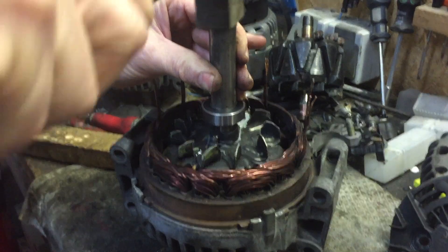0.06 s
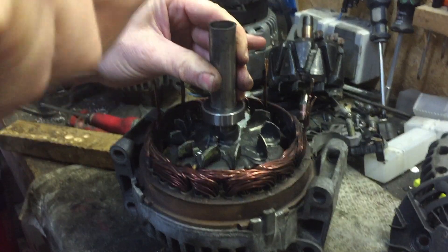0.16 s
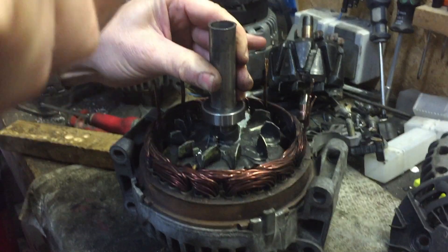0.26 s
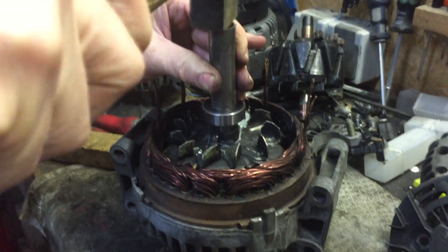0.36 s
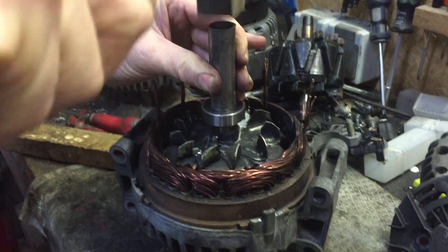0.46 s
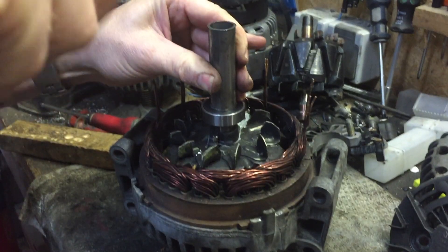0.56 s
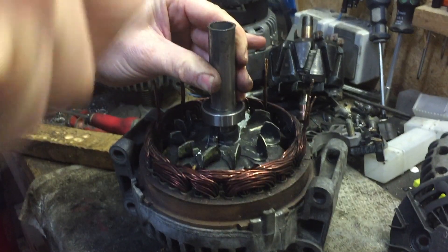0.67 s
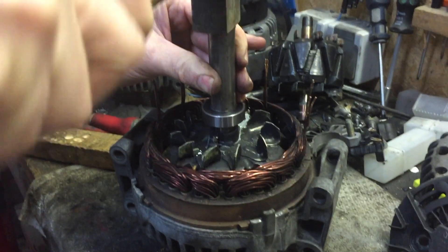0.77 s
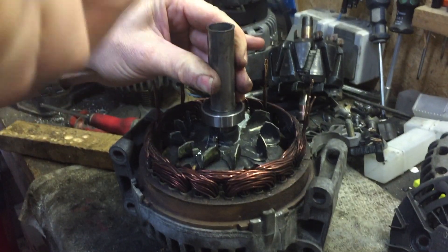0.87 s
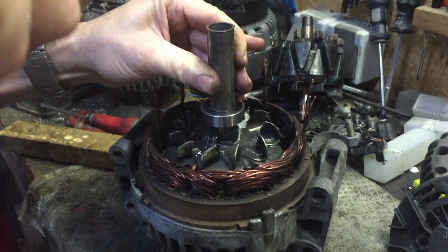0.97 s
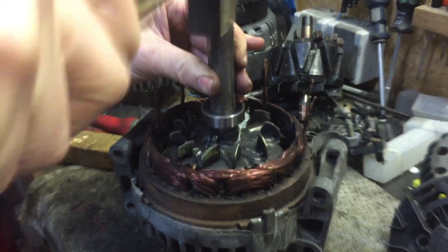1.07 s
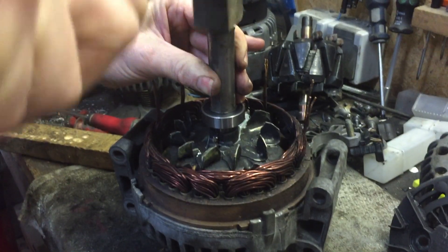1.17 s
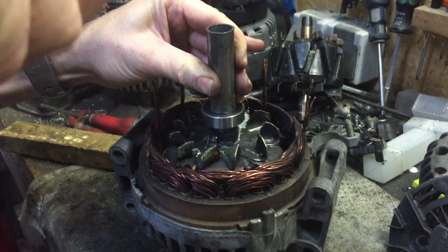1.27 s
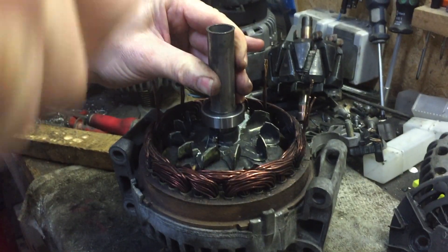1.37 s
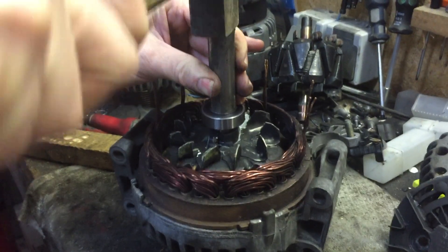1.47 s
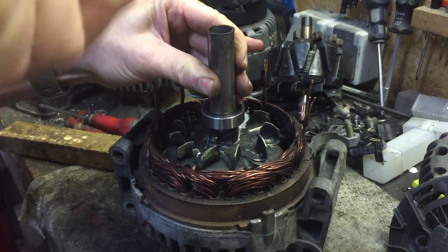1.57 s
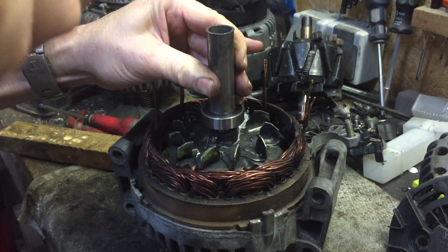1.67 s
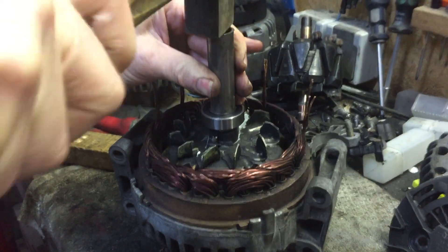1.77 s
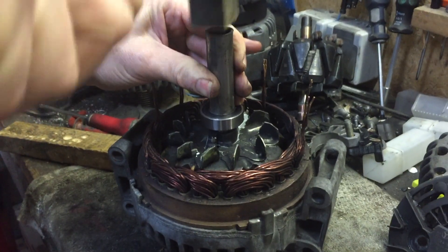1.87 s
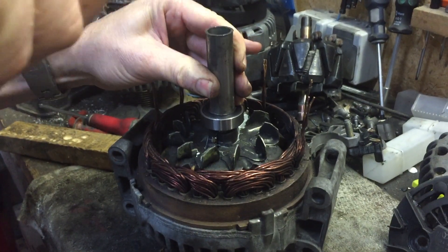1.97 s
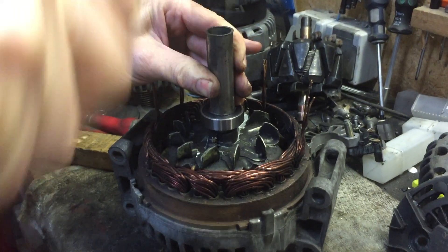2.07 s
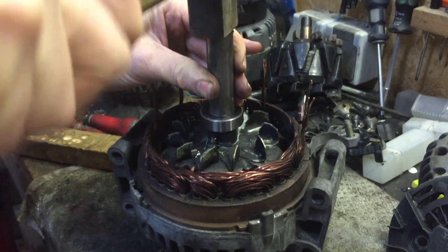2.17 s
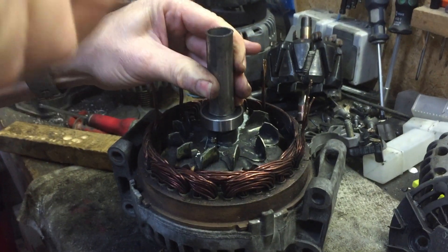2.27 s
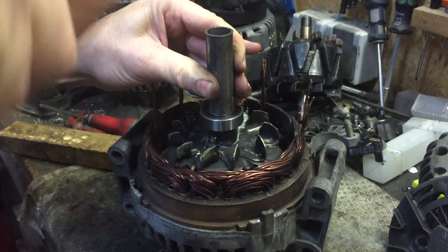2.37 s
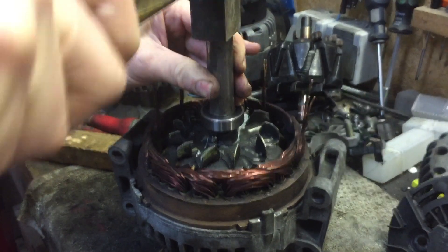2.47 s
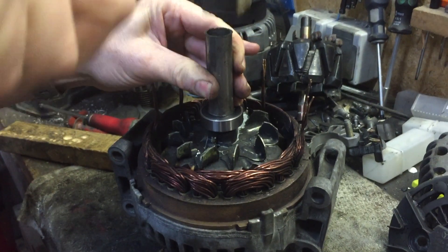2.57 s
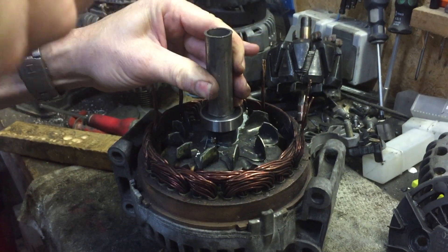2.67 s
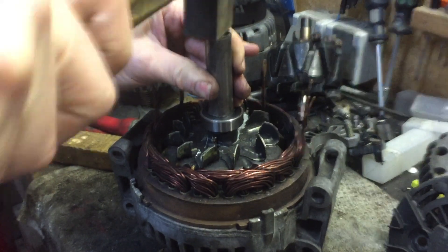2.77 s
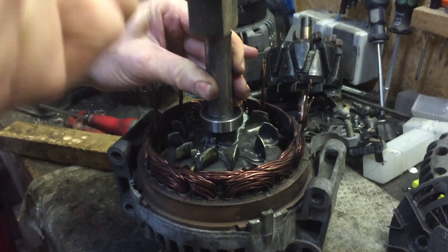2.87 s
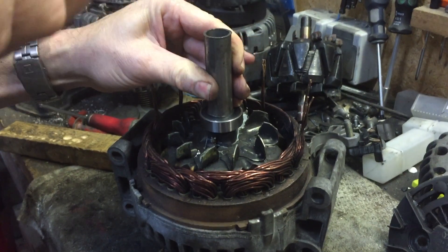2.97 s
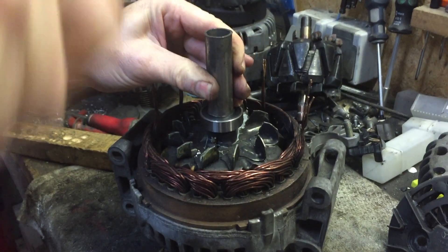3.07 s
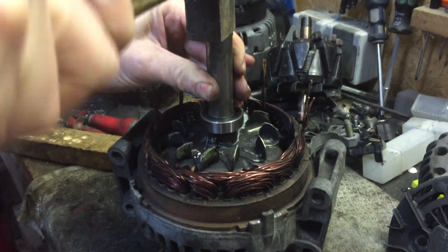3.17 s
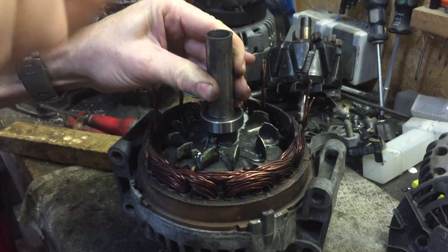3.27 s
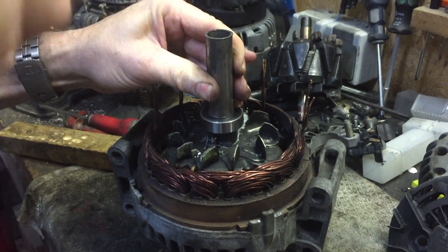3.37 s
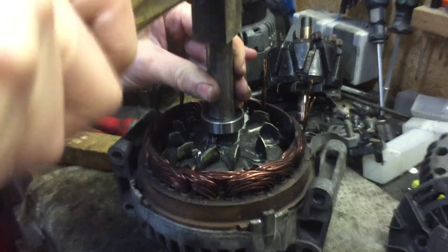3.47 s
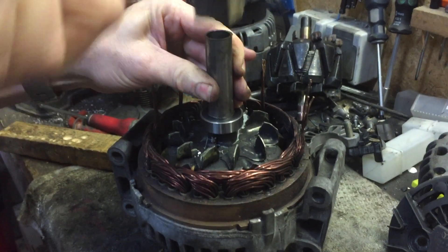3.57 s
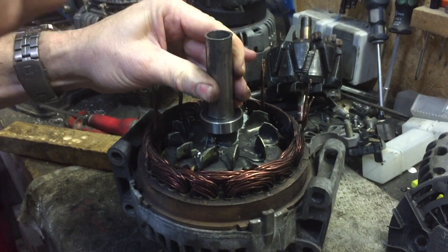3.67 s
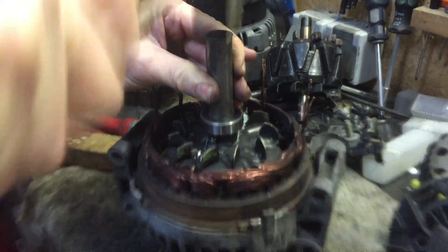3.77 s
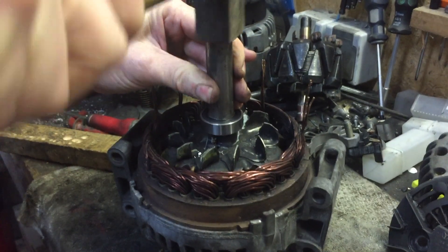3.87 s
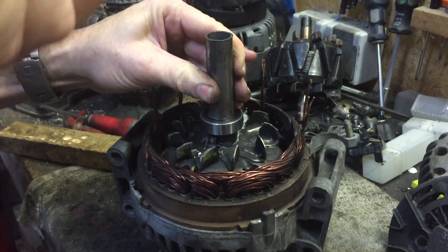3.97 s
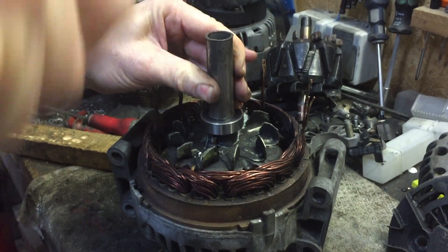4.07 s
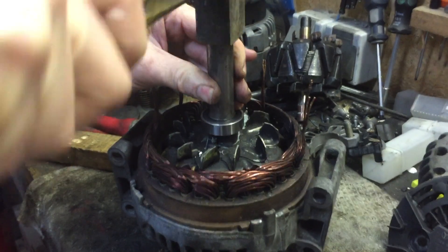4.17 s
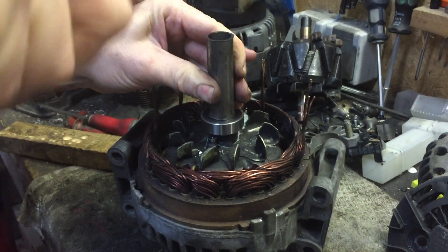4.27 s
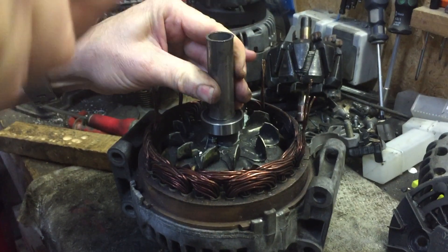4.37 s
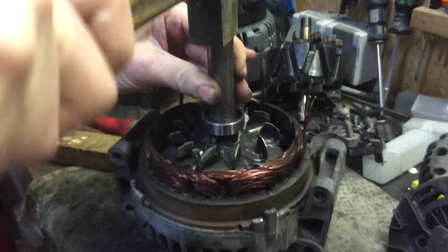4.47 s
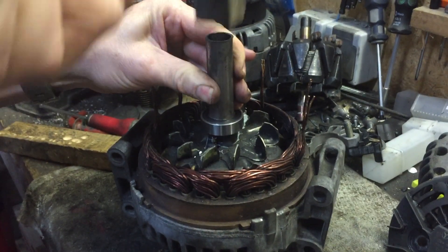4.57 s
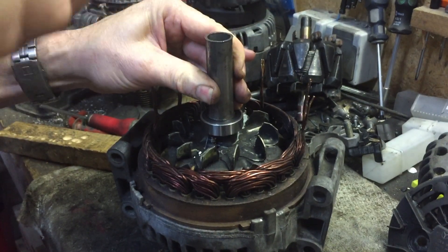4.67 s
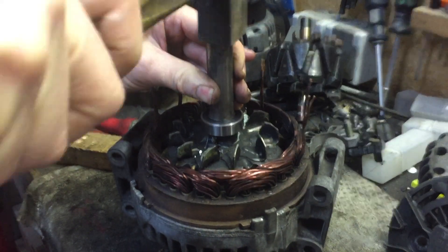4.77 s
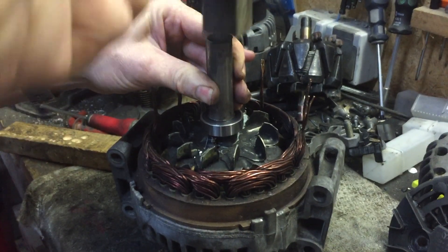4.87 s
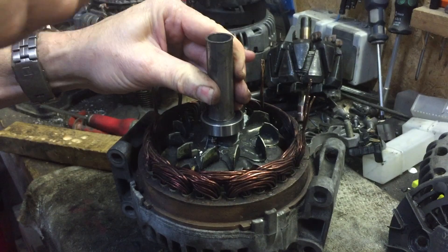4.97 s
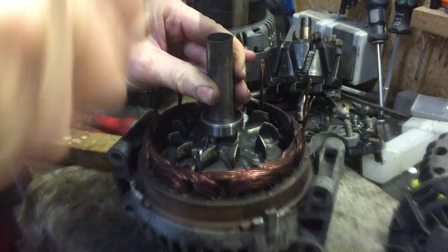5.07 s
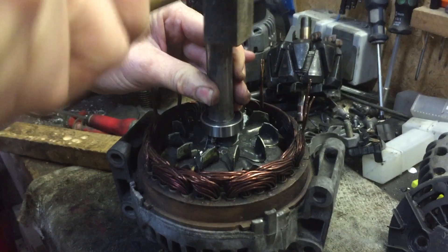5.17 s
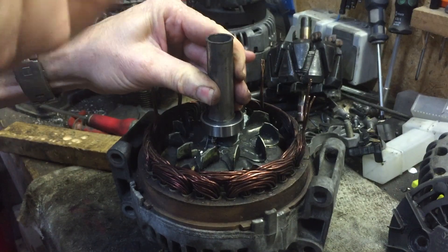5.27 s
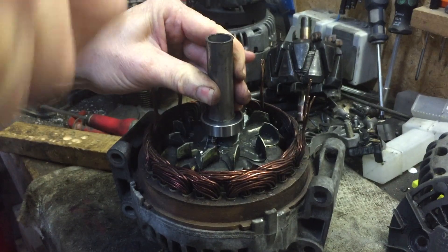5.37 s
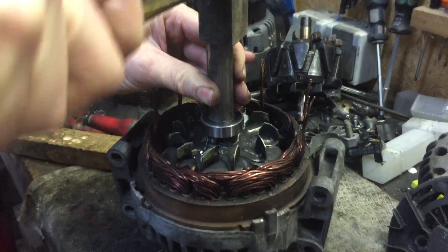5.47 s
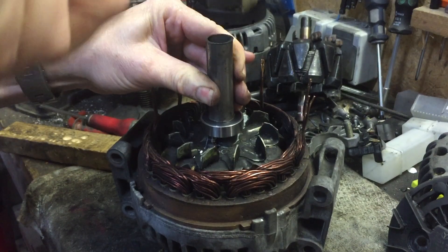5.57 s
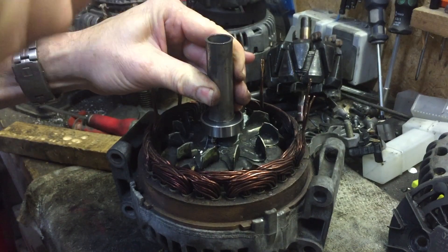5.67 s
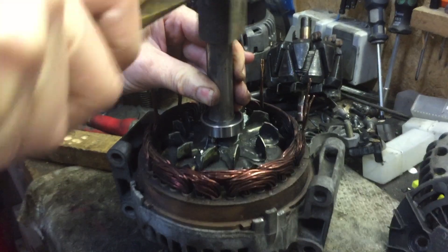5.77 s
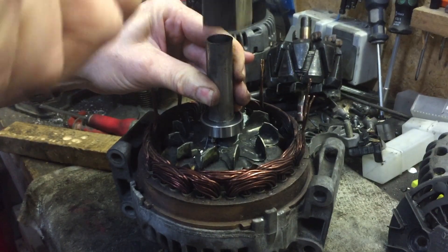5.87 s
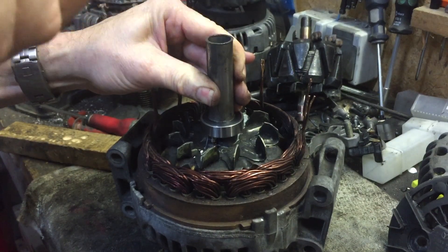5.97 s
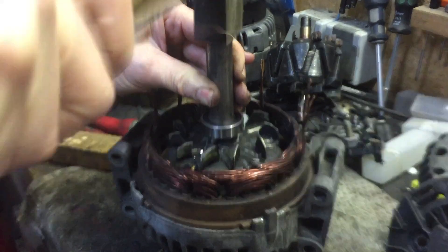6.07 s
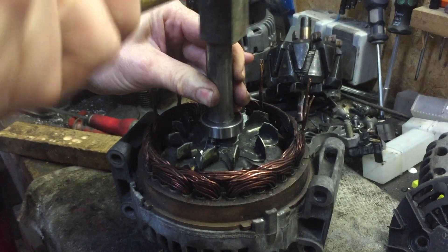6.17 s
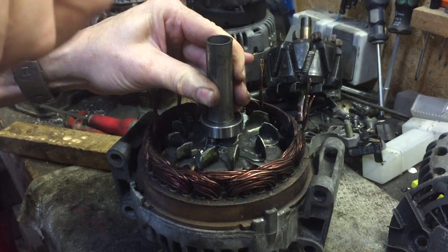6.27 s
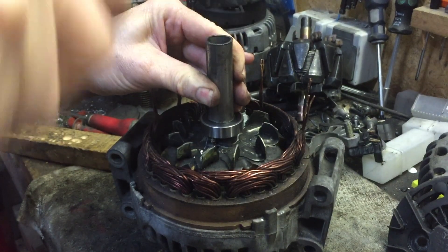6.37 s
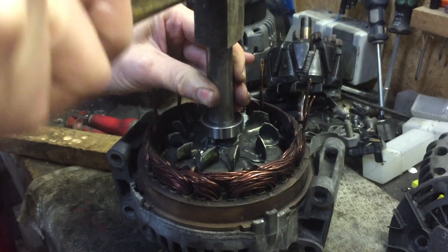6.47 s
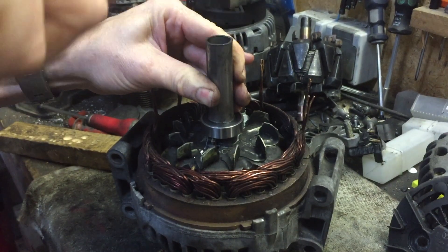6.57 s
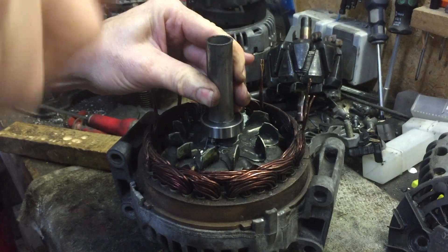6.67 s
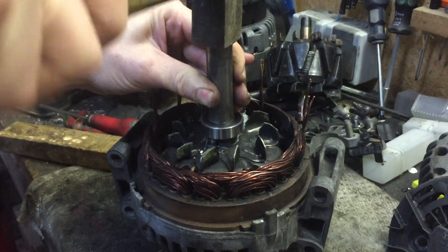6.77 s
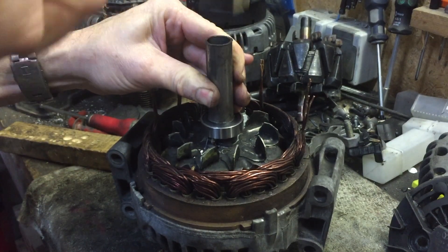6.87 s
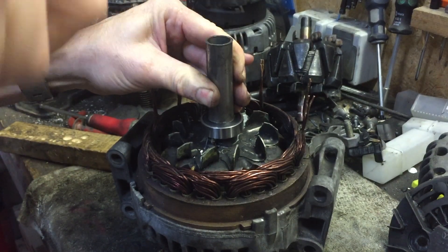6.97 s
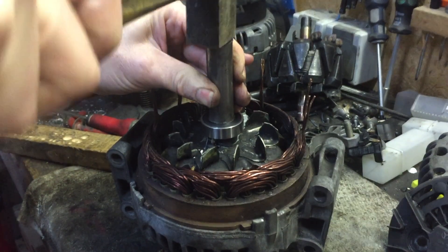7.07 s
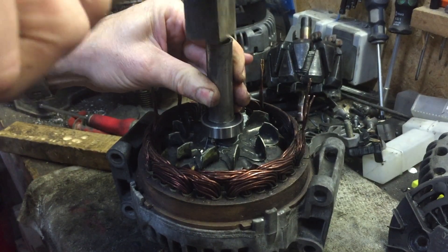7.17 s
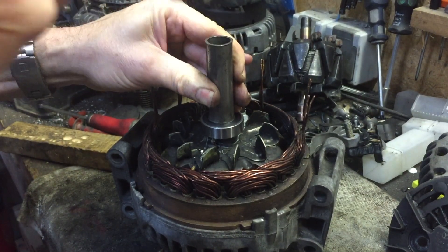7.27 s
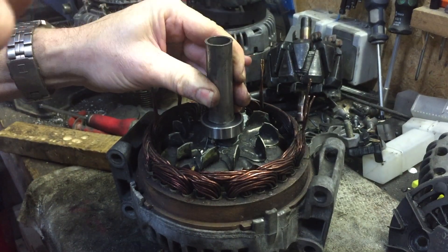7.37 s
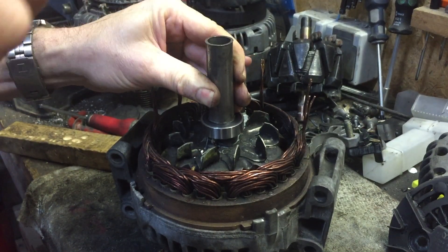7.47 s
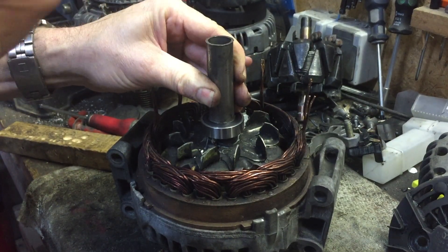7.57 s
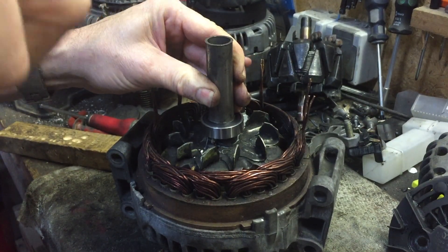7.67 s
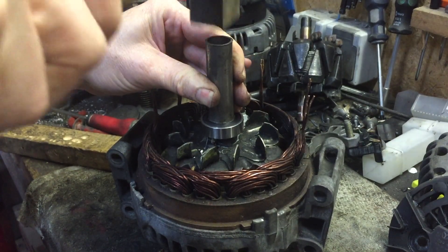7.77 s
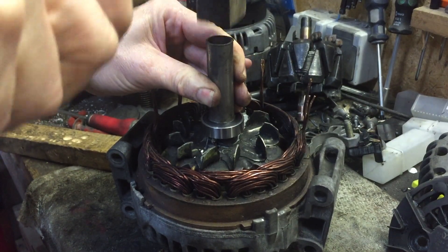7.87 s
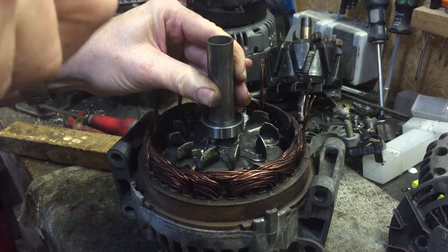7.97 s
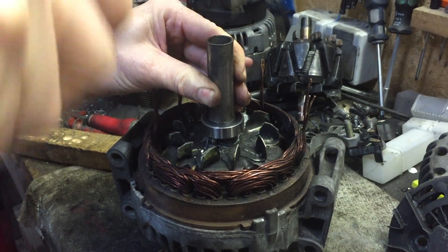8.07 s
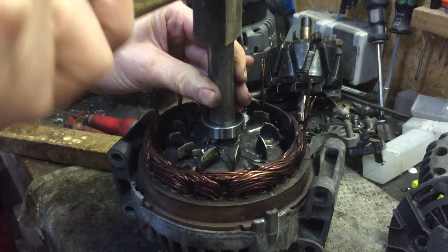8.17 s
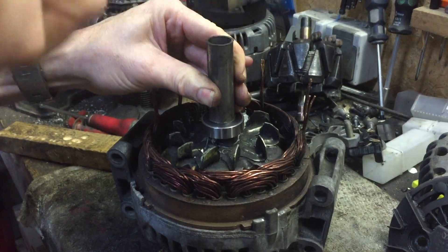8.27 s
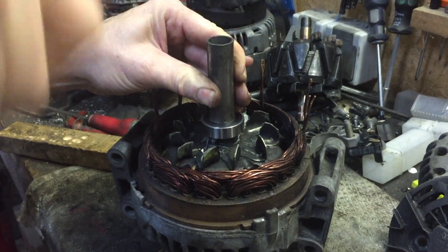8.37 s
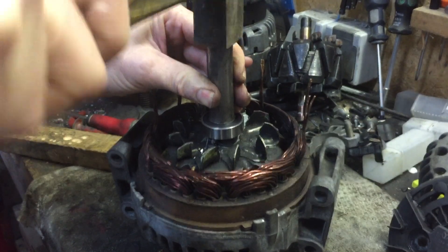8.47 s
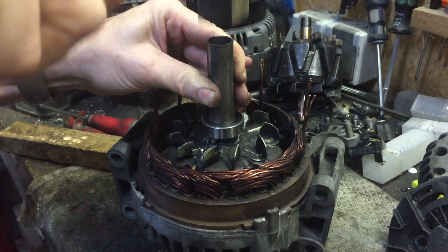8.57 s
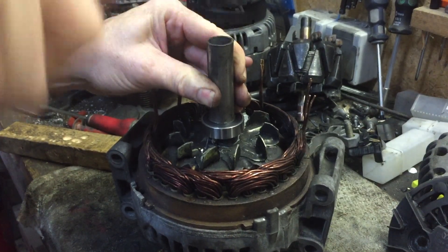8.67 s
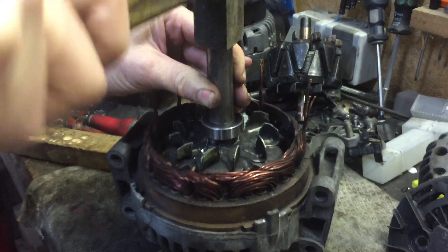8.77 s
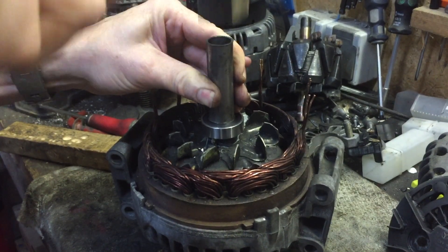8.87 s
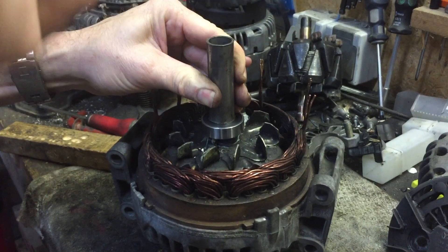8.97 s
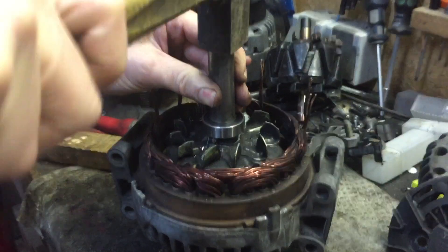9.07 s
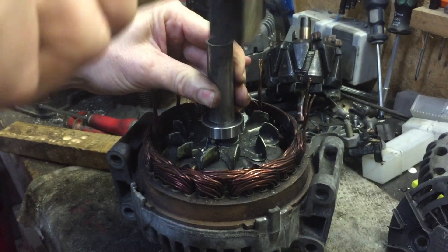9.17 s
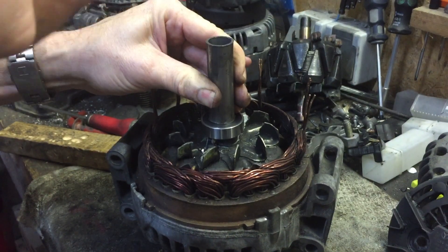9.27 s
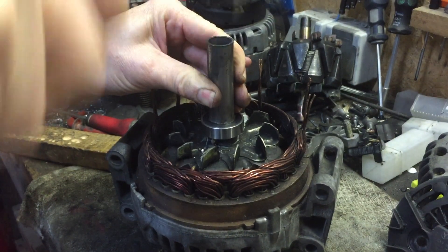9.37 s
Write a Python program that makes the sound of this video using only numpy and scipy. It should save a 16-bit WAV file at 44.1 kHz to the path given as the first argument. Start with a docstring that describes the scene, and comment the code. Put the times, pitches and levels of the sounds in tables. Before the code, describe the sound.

In a small workshop, sharp steel-on-steel hammer blows land in an even rhythm right beside the microphone, distorting a little. Each crack carries a damped ping from a metal tube and a knock through the bench, some with a low puff of air. The hits start bright and gradually dull. They stop briefly, leaving only a faint low rumble, then resume for four last blows with a slight metallic chatter.

```python
"""Sharp cracks of a hammer on steel, close up in a small workshop: three blows a second, with one pause.
The hammer drives a bearing onto an alternator shaft through a hand-held steel tube. Each blow cracks in
the steel, pings the damped tube and knocks the housing on its bench; some also shove air at the
microphone. The room answers from behind, over a low rumble. The phone is so near that it overloads on
every blow; its noise gate shuts in the pause."""
import sys
import numpy as np
from scipy import signal
from scipy.fft import rfft, irfft, next_fast_len
from scipy.io import wavfile

SR = 44100
rng = np.random.default_rng(int(sys.argv[2]) if len(sys.argv) > 2 else 0)


def generate_wav(signal):
    """Clip the signal to [-1, 1] and save it as 16-bit WAV at the path in sys.argv[1]."""
    frames = np.transpose(np.atleast_2d(signal))
    scaled = np.clip(frames, -1, 1) * 32767
    pcm = np.round(scaled).astype(np.int16)
    wavfile.write(sys.argv[1], SR, pcm)


N = 415422
TIME = np.arange(N) / SR
AGE = np.arange(SR // 4) / SR  # seconds into one short sound

# room tone: f/Hz, relative spectral level/dB
ROOM_TONE = [(25, -14.5), (45, 0.5), (64, 3.5), (100, -11), (200, -21), (380, -19), (700, -24), (2500, -28),
             (7000, -30.5), (11000, -42), (16000, -52)]
# the workshop's answer: f/Hz, early reflections/dB, late tail/dB, late t60/s
ROOM_BANDS = [(60, -4.5, -0.5, 2.8), (200, 5.5, 1, 1.3), (375, 6.5, 2.5, 1.1), (660, -3, -6, 1),
              (1400, 1.5, -1.5, 0.88), (2620, 3, 2.5, 0.75), (4970, -5, -0.5, 0.53),
              (9700, -4.5, -3.5, .48), (10900, -4.5, -8.5, 0.49), (16000, -9.5, -9, .23)]
# modes of housing and bench: f/Hz, level/dB, t60/s
HOUSING_MODES = [(59.6, -28, 0.94), (100, -19, 0.24), (136, -5, 0.11), (165, -5, 0.038), (186.3, -5, 0.16),
                 (216, -8.5, 0.0098), (304.4, -7, 0.12), (332.6, -4, 0.13), (405.7, -13.5, 0.18),
                 (455.6, -3, 0.12), (530, -5.5, 0.015), (614, -1.5, 0.055), (700, -5, 0.021),
                 (767, -0.5, 0.055), (852, -12.5, 0.089), (957, -11, 0.054), (1135, -18.5, 0.11),
                 (1300, -18.5, 0.036), (1485, -10, 0.053), (2167, -15, 0.047), (2404, -14, 0.054),
                 (2520, -14, 0.089), (4220, -17, .05), (4340, -20.5, .05), (7340, -18, 0.087),
                 (7250, -22.5, .05)]
# the hand-held tube, bending modes below 5 kHz and wall modes above: f/Hz, level/dB, t60/s
TUBE_MODES = [(2944, -13.5, 0.026), (3120, -5.5, 0.041), (3388, -2.5, 0.036), (3544, -4.5, 0.022),
              (8677, -5.5, 0.022), (8785, -4, 0.022), (8982, -3, 0.021), (9350, -2, 0.011),
              (9750, -12, 0.019)]
# spectrum of the crowd of short steel modes: f/Hz, level/dB
STEEL_SPECTRUM = [(60, -4.5), (200, 2), (700, 9), (1200, 0.5), (1700, -2.5), (2300, 0), (2800, -7),
                  (4100, -3), (4900, -5.5), (6400, -1), (8000, -2), (9200, -3), (10500, -5.5),
                  (16000, -9.5)]
# the tube chatters on the bearing after a blow: t/s, level/dB, length/s
REBOUNDS = [(4.552, -35, 0.0085), (6.191, -26, 0.013), (6.515, -27, 0.0089), (8.526, -17.5, 0.022),
            (9.1525, -21, .004), (9.162, -25, 0.0043)]
# the contact dulls as the bearing goes home: t/s, hardness as treble tilt/dB
CONTACT_HARDNESS = [(.09, 11.5), (1.85, 2.5), (5.5, -.5), (7.1, -0.5), (9.13, -7)]
# hammer blows: t/s, strength/dB, tube clank/dB, air thump/dB
HAMMER_BLOWS = [(0.0933, 1, -15.5, -33), (0.45, -4, -16, -7.5), (0.7986, -.5, -14.5, -18.5),
                (1.16, 1, -22, -17.5), (1.5, 0, -8.5, -1.5), (1.845, 0, -27, -4),
                (2.181, -3.5, -10.5, -2.5), (2.522, 0, -4.5, -15.5), (2.8558, 1.5, -8, -12.5),
                (3.1905, 1.5, -6.5, -22.5), (3.5348, 0, -13.5, -9), (3.8711, 0.5, -12.5, -9),
                (4.2072, -.5, -13.5, -18), (4.5339, -1.5, -14, -7.5), (4.8556, 1.5, -6.5, -8),
                (5.178, 2.5, -1.5, -6), (5.512, 1, -8.5, -5), (5.8413, 1, -1, -4.5), (6.1698, 1, -11, -20),
                (6.4989, 1.5, -10.5, -16.5), (6.8, 0, -12.5, -5.5), (7.1203, -0.5, -5.5, -16.5),
                (8.197, -0.5, -8, -31), (8.5076, 2.5, -9, -19), (8.8117, .5, -25, -17.5),
                (9.1346, 3, -6, -17)]


def undb(db):
    """Decibels to amplitude."""
    return 10 ** (np.asarray(db) / 20)


def fade(t, t60):
    """Exponential decay, 60 dB down after t60."""
    return np.exp(-np.minimum(np.log(1000) * t / t60, 60))


def swell(t, rise_s):
    """Smooth rise from 0 to 1."""
    return 1 - np.exp(-np.minimum(t / rise_s, 6) ** 2)


def unit(x):
    """Scale to rms 1."""
    return x / np.sqrt(np.mean(x ** 2))


def along(hz, points, values):
    """Read a spectrum on a log-frequency axis."""
    return np.interp(np.log(np.maximum(hz, 1)), np.log(points), values)


def colour(x, spectrum, tilt_db=0):
    """Filter by a spectrum (f/Hz, level/dB), with a tilt that reaches tilt_db at 11 kHz."""
    hz = np.arange(len(x) // 2 + 1) * SR / len(x)
    db = along(hz, *np.transpose(spectrum)) + tilt_db * hz / (SR / 4)
    return irfft(rfft(x) * undb(db), len(x))


def add(out, s, sound):
    """Mix a sound in at time s."""
    i = int(s * SR)
    out[i:i + len(sound)] += sound[:N - i]


def modes(table, t):
    """The free ring of each mode (f/Hz, level/dB, t60/s), one row a mode."""
    hz, db, t60 = np.transpose(table)[:, :, None]
    return undb(db) * np.sin(2 * np.pi * hz * t) * fade(t, t60)


def strike(ringing, scatter_db):
    """Each contact point weights the modes anew; neighbouring modes start in opposite directions."""
    count = len(ringing)
    weight = (-1) ** np.arange(count) * undb(scatter_db * rng.standard_normal(count))
    return weight @ ringing


def room_tone(db=-58):
    """The workshop at rest: low rumble and faint hiss."""
    white = rng.standard_normal(next_fast_len(N, True))
    return undb(db) * unit(colour(white, ROOM_TONE))[:N]


def workshop(x, early_db=-41, late_db=-58, early_t60=0.17, rise_s=0.0023):
    """Dense early reflections off bench and tools, then a faint tail that loses its treble first."""
    t, hz = TIME[:SR], np.arange(SR // 2 + 1)
    white = rfft(rng.standard_normal(SR))
    centres_hz = np.transpose(ROOM_BANDS)[0]
    response = 0
    for share, (_, early, late, t60) in zip(np.eye(len(ROOM_BANDS)), ROOM_BANDS):
        band = irfft(white * along(hz, centres_hz, share), SR)
        decay = undb(early_db + early) * fade(t, early_t60) + undb(late_db + late) * fade(t, t60)
        response = response + band * decay
    return signal.fftconvolve(x, response * swell(t, rise_s))[:N]


def air_thumps(db=5.0, lead_s=.002, end_hz=47, drop_hz=235, glide_s=.005):
    """Air shoved ahead of the hammer buffets only the microphone: a few swings that slow down."""
    hz = end_hz + drop_hz * np.exp(-AGE / glide_s)
    thump = np.sin(2 * np.pi * np.cumsum(hz) / SR) * fade(AGE, t60=0.07) * swell(AGE, rise_s=0.0023)
    out = np.zeros(N)
    for s, *_, air in HAMMER_BLOWS:
        add(out, s - lead_s, undb(db + air) * thump)
    return out


def housing_knock(rise_s=0.0061, extra_db=8, settle_s=.011):
    """The blow travels down the shaft into housing and bench, whose first strong swings soon settle."""
    t = TIME[:SR // 2]
    first_swings = 1 + undb(extra_db) * (1 - swell(t, settle_s))
    return modes(HOUSING_MODES, t) * swell(t, rise_s) * first_swings


def tube_ring(tube, ping_db, clank_db):
    """A blow on the rim pings the wall; an off-centre blow also bends the tube, which clanks."""
    bending = np.transpose(TUBE_MODES)[0] < 5000
    gains = undb(np.where(bending, clank_db, ping_db))
    return strike(tube * gains[:, None], scatter_db=2)


def room_crack(hard_db, size=256):
    """The crack summed over all directions, as the room receives it: its peaks and dips even out."""
    return unit(colour(signal.unit_impulse(size, "mid"), STEEL_SPECTRUM, hard_db))


def crack(hard_db, steel, t60=.022, fresh_db=3):
    """Hammer, bearing and rotor: modes too close to hear apart; a hard contact favours the high ones."""
    size = len(steel)
    fresh = undb(fresh_db) * rng.standard_normal(size)  # partly new at each blow
    return unit(colour(steel + fresh, STEEL_SPECTRUM, hard_db)) * fade(AGE[:size], t60)


def chatter(tube, steel, db=-3, count=4):
    """The tube bounces on the bearing: runs of tiny rebounds, each a soft crack and a ping."""
    out = np.zeros(N)
    for start, level, length in REBOUNDS:
        for s in start + length * (np.arange(count) + rng.random(count) / 2) / count:
            add(out, s, undb(db + level) * crack(hard_db=-1, steel=steel))
            add(out, s, undb(db + level) * tube_ring(tube, ping_db=-1, clank_db=-10))
    return out


def contact(s, strength, air, seating_s=0.72, loose_knock_db=-9, loose_ping_db=-23.5):
    """Hardness, knock and ping of a blow in dB: until the bearing tightens, housing and tube ring less."""
    loose = np.exp(-s / seating_s)
    # a stronger blow is brighter and knocks the housing harder
    hard = np.interp(s, *np.transpose(CONTACT_HARDNESS)) + .9 * strength
    knock = 1.3 * strength + loose_knock_db * loose
    ping = -.36 * air + loose_ping_db * loose  # following through with a thump damps the ping
    return hard, knock, ping


def hammering(tube, steel, ping_db=-11.5, clank_db=-3, knock_db=-17.0):
    """Hammer on tube, blow by blow: what goes straight to the microphone, and what goes into the room."""
    direct, to_room = np.zeros(N), np.zeros(N)
    housing = housing_knock()
    for s, strength, clank, air in HAMMER_BLOWS:
        hard, knock, ping = contact(s, strength, air)
        ring = tube_ring(tube, ping_db + ping, clank_db + clank)
        thud = undb(knock) * strike(housing, scatter_db=3.0)
        add(direct, s, undb(strength) * crack(hard, steel))
        add(direct, s, ring)
        add(direct, s, undb(knock_db) * thud)
        add(to_room, s, undb(strength - 5) * room_crack(hard))
        add(to_room, s, undb(-2) * ring)
        add(to_room, s, undb(-18.5) * thud)
    return direct, to_room


def scene():
    """One microphone at the bench: steel and shoved air up close, the workshop behind."""
    tube = modes(TUBE_MODES, AGE)
    steel = rng.standard_normal(size=2048)  # the part that all cracks share
    direct, to_room = hammering(tube, steel)
    rebounds = chatter(tube, steel)
    return (direct + rebounds + workshop(to_room + rebounds) + air_thumps() + room_tone())[None]


def gate(x, open_db=-20, hold_s=.28, close_s=.07, depth_db=-13, split_hz=230):
    """Noise gate: turns all but the rumble down once nothing loud has come for a while."""
    loud = np.abs(x) > undb(open_db)
    last_loud = np.maximum.accumulate(np.where(loud, TIME, -hold_s), axis=-1)
    idle = np.maximum(TIME - last_loud - hold_s, 0)
    closed = 1 - np.exp(-idle / close_s)
    rumble = signal.sosfiltfilt(signal.butter(2, split_hz, fs=SR, output="sos"), x)
    return rumble + (x - rumble) * undb(depth_db * closed)


def record(dry, ceiling=0.48, knee=4, top_hz=15900):
    """The close microphone flattens the peaks; the phone gates the quiet and cuts the top."""
    clipped = dry / (1 + np.abs(dry / ceiling) ** knee) ** (1 / knee)
    lowpass = signal.ellip(8, .2, 70, top_hz, fs=SR, output="sos")
    return signal.sosfilt(lowpass, gate(clipped))


dry = scene()
out = record(dry)
generate_wav(out)
```